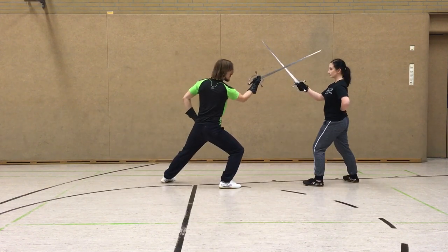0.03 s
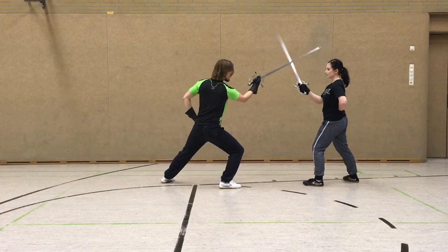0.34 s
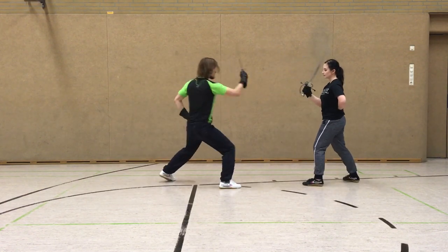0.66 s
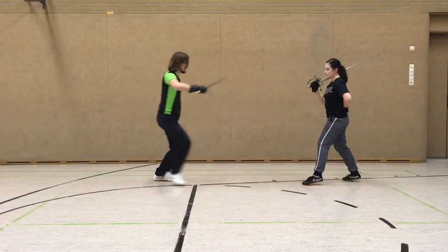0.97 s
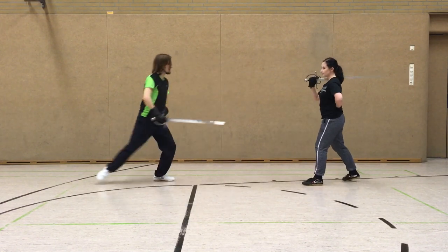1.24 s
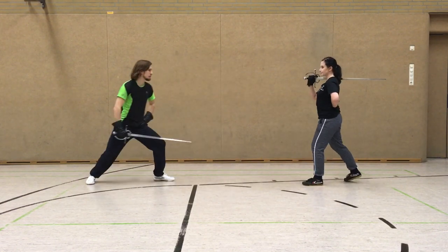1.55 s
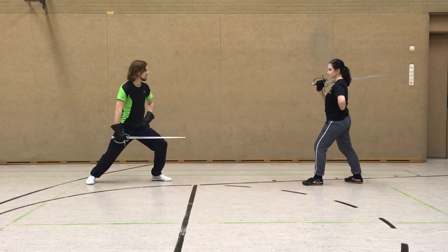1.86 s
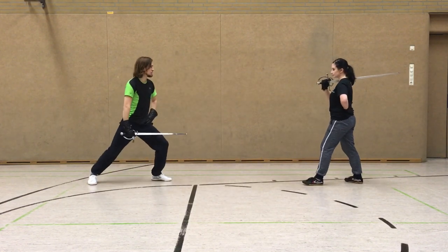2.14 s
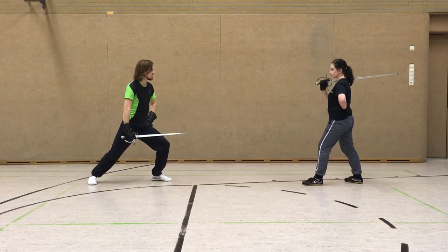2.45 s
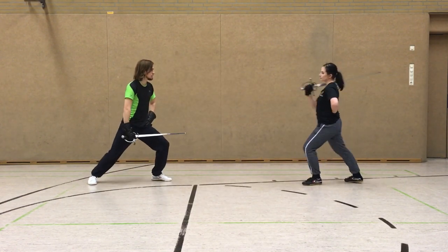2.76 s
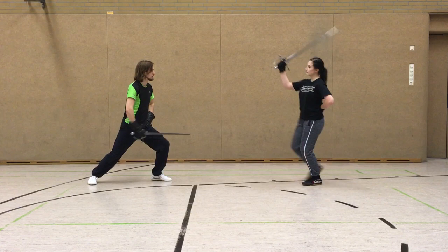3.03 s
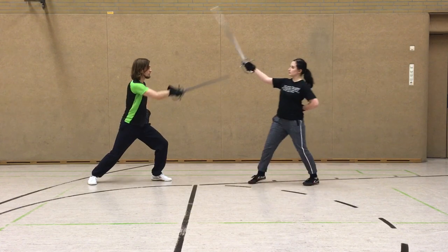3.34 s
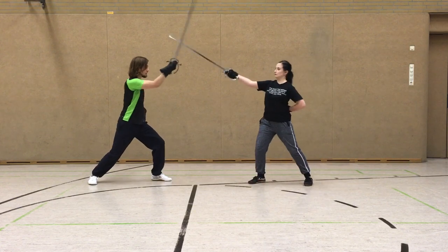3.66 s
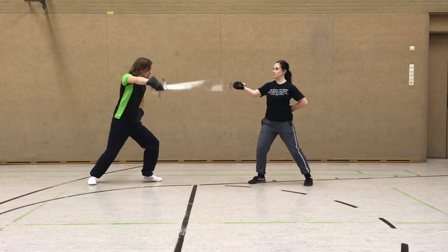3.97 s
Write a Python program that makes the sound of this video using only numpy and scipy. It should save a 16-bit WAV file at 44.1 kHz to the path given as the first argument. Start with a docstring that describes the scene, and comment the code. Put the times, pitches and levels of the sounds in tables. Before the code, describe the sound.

Rapier blades clash and ring after a run of footsteps in an echoing sports hall.

```python
"""Two fencers drill with rapiers in a sports hall. A hollow resonance fades over a quiet room tone.
A sleeve or sole swishes faintly; from 0.8 s shoes slap and thud on the sprung floor and a loose
hilt clicks. Two more swishes pass among the steps. After 3.5 s the blades clash, chatter and
scrape along each other, each contact waking the modes of the steel, and the hall rings on."""
import sys
import numpy as np
from scipy import signal
from scipy.fft import rfft, irfft, next_fast_len
from scipy.io import wavfile
from scipy.ndimage import map_coordinates

SR = 44100
rng = np.random.default_rng(int(sys.argv[2]) if len(sys.argv) > 2 else 0)


def file_out(sig):
    """Save sig as 16-bit WAV at sys.argv[1]."""
    # one column per channel
    cols = np.atleast_2d(sig).T
    # limit, then scale
    lim = np.clip(cols, -1, 1)
    pcm = np.round(lim * 32767).astype(np.int16)
    wavfile.write(sys.argv[1], SR, pcm)


N = 176400


def amp(db):
    """dB to gain."""
    return 10 ** (np.asarray(db) / 20)


def unit(x):
    """Scale to energy 1."""
    return x / np.sqrt(np.sum(x ** 2) + 1e-20)


def along(points, hz):
    """Interpolate (f/Hz, value) points on a log axis."""
    f, values = np.transpose(points)
    return np.interp(np.log(hz + 1), np.log(f + 1), values)


def fade(t, t60):
    """Gain falling 60 dB in t60."""
    return np.exp(-np.log(1000) * t / np.maximum(t60, 1e-4))


def mode(t, hz, db, t60):
    """Damped sine, random phase."""
    return amp(db) * fade(t, t60) * np.sin(2 * np.pi * (hz * t + rng.random()))


def noise(spectrum, size):
    """Coloured noise, rms 1."""
    gain = amp(along(spectrum, np.fft.rfftfreq(size, 1 / SR)))
    return unit(irfft(rfft(rng.standard_normal(size)) * gain, size)) * np.sqrt(size)


def add(track, start_s, sound):
    """Mix sound into track at start_s."""
    i = round(start_s * SR)
    track[i:i + len(sound)] += sound[:N - i]


# Hall reverberation: f/Hz, t60/s
HALL_DECAY = [(100, 1.34), (500, 4.6), (1300, 1.13), (3500, 2.7), (6000, 1.15), (9000, 0.97), (15000, 0.37)]


def hall(x, wet_db, delay_s=0.0048, build_s=0.005, echo_span_s=0.035, echo_db=-12.5):
    """Direct sound, ten floor and wall echoes, and a long tail that dulls as it dies."""
    hz, t, white = signal.stft(rng.standard_normal(3 * SR // 2), SR, nperseg=256)
    tail = signal.istft(white * fade(t, along(HALL_DECAY, hz)[:, None]), SR, nperseg=256)[1]
    late_s = np.maximum(np.arange(len(tail)) / SR - delay_s, 0)
    response = amp(wet_db) * unit(tail * (1 - np.exp(-late_s / build_s)))
    echo_at = (SR * echo_span_s * (.1 + rng.random(size=10))).astype(int)
    response[echo_at] += amp(wet_db + echo_db) * unit(rng.standard_normal(size=10))
    response[0] += 1
    return signal.fftconvolve(x, response)[:N]


# Room tone spectrum: f/Hz, level/dB
ROOM_TONE = [(20, -13), (40, -8.5), (85, -2.5), (175, -4.5), (300, -4), (470, -16), (800, -22), (1400, -24),
             (2400, -28), (4800, -30.5), (7400, -37), (9000, -33), (13500, -38), (15000, -43), (15800, -49)]
# Hollow resonance spectrum: f/Hz, level/dB
HOLLOW = [(200, -13.5), (450, -9.5), (550, -2.5), (690, -2.5), (820, -19.5), (1250, -19), (2000, -32),
          (5000, -62)]


def room(tone_db=-65.5, waver_db=0.16, waver_per_s=6, hollow_db=-63, hollow_t60_s=2.04):
    """Near-steady rumble and hiss; a hollow resonance dies away in the hall."""
    t = np.arange(N) / SR
    waver = map_coordinates(rng.standard_normal(size=200), [t * waver_per_s])
    tone = amp(tone_db - waver_db * waver) * noise(ROOM_TONE, N)
    return tone + amp(hollow_db) * fade(t, hollow_t60_s) * noise(HOLLOW, N)


# Swishes: peak t/s, rise sigma/s, fall sigma/s, level/dB
SWISHES = [(.85, 0.15, 0.052, -76.5), (1.705, 0.036, 0.037, -67.5), (2.17, 0.031, 0.024, -70)]
# Rubbing spectrum: f/Hz, level/dB
RUBBING = [(200, -4), (900, 2.5), (2200, 5), (4500, 3), (7500, -3.5), (11500, -1.5), (16000, -9)]


def swishes():
    """Sleeves and sliding soles rub; the noise swells and falls with each quick move."""
    t = np.arange(N) / SR
    envelope = sum(amp(db) * np.exp(-.5 * ((t - peak_s) / np.where(t < peak_s, rise_s, fall_s)) ** 2)
                   for peak_s, rise_s, fall_s, db in SWISHES)
    return hall(envelope * noise(RUBBING, N), wet_db=-2)


# Footfalls: t/s, thud level/dB, slap level/dB
STEPS = [(0.796, -21.5, -36.5), (1.007, -14.5, -25.5), (1.18, -20.5, -34.5), (1.342, -8, -27.5),
         (1.555, -19, -38), (1.603, -18, -38), (1.736, -17.5, -29), (1.85, -23.5, -44), (2.2, -34.5, -39),
         (2.364, -33, -39), (2.712, -32, -32), (2.959, -29, -52), (3.32, -8.5, -22), (3.429, -15, -26.5)]
# Sprung floor modes: f/Hz, level/dB, t60/s
FLOOR_MODES = [(67, -17.5, 0.053), (84.4, -0.5, 0.25), (111.4, 1.5, 0.11), (154.5, 7.5, 0.12),
               (212.5, -7.5, 0.088), (252.6, -5.5, 0.064)]
# Board rattle spectrum: f/Hz, level/dB
BOARDS = [(30, -34), (70, 14.5), (150, 0.5), (280, 2), (420, -12.5), (600, -21.5), (1200, -43.5),
          (4000, -76)]
# Sole slap spectrum: f/Hz, level/dB
SOLE = [(100, 22.5), (400, -6), (700, 2), (1400, 4), (2500, -5.5), (4000, -34), (12000, -32)]


def footsteps(detune=0.13, boards_db=-9, thud_rise_s=0.031, slap_rise_s=0.0025):
    """A rubber sole lands softly; the weight rattles boards and booms the floor, each spot its own way."""
    thuds, slaps, t = np.zeros(N), np.zeros(N), np.arange(SR // 2) / SR
    for start_s, thud_db, slap_db in STEPS:
        boom = sum(mode(t, hz * (1 + detune * rng.normal()), db, t60) for hz, db, t60 in FLOOR_MODES)
        rattle = unit(noise(BOARDS, len(t)) * fade(t, t60=0.23))
        thud = (unit(boom) + amp(boards_db) * rattle) * (1 - np.exp(-t / thud_rise_s))
        slap = noise(SOLE, len(t)) * fade(t, t60=0.054) * (1 - np.exp(-t / slap_rise_s))
        add(thuds, start_s, amp(thud_db) * unit(thud))
        add(slaps, start_s, amp(slap_db) * unit(slap))
    return hall(thuds, wet_db=-6.5) + hall(slaps, wet_db=-0.5)


# Hilt clicks: t/s, level/dB
CLICKS = [(0.866, -41), (1.191, -44), (3.1968, -27), (3.209, -31.5), (3.336, -37)]
# Guard tick spectrum: f/Hz, level/dB
GUARD = [(300, -1.5), (1200, 6.5), (2500, 6.5), (5000, -1.5), (7500, -6.5), (10000, -4), (11000, 8.5),
         (12500, -6), (16000, -4)]


def hilt(ring_hz=10900, ring_db=-25):
    """A loose guard ticks and rings thinly as the sword turns."""
    clicks, t = np.zeros(N), np.arange(SR // 2) / SR
    for start_s, db in CLICKS:
        tick = unit(noise(GUARD, len(t)) * fade(t, t60=0.02))
        ring = unit(np.sin(2 * np.pi * ring_hz * t) * fade(t, t60=0.13))
        add(clicks, start_s, amp(db) * (tick + amp(ring_db) * ring))
    return hall(clicks, wet_db=0.5)


# Blade contacts: t/s, relative level/dB, chatter t60/s, treble tilt/(dB/octave)
CONTACTS = [(3.5468, -17, 0.012, 1.5), (3.5625, -22.5, 0.025, 0), (3.572, -20.5, 0.03, 0),
            (3.678, -24, 0.16, 0), (3.6935, -28, 0.027, 1.5), (3.7578, -23, 0.069, 3),
            (3.783, -29.5, 0.083, -2), (3.797, -24, 0.033, 1.5)]
# Strong blade modes: f/Hz, level/dB, t60/s
BLADE_MODES = [(737, -9, .9), (1104, -3, .8), (1348, 1.5, .7), (1763, -5, .8), (2331, -5, .7),
               (2530, -3, .7), (2912, -4, .7), (3222, -4, .7), (3924, -4, .7), (4274, -3, .7),
               (4678, -4, .6), (5406, -3, .6), (5872, 4.5, .35), (6385, -2, .5), (8986, -1.5, .5),
               (9048, 0, .55), (10642, 0, .4), (11186, -1, .4), (11807, -2, .4), (15381, -4, .3),
               (15532, -4, .3)]
# Crowd of weak blade and guard modes: f/Hz, spectral density/dB
STEEL = [(120, -40), (170, -21), (300, -7), (540, -11), (700, -1), (960, -9.5), (1200, 2), (1800, -5),
         (2600, -1), (3700, -4.5), (6000, 2), (7300, -1), (9000, 2.5), (11500, 5), (13500, -1.5),
         (15700, -1.5)]
TOP_HZ = 15800


def blades(gain_db=26.5, blow=0.43, crack_db=-3, ring_db=-10, flex_hz=8.07,
           weak_modes=480, cluster_db=2, cluster_hz=27, radiate_hz=156):
    """Each contact, a blow and a dying chatter of tiny impacts, wakes its own mix of steel modes."""
    clatters, rings, t = np.zeros(N), np.zeros(N), np.arange(SR // 2) / SR
    spread = (np.arange(weak_modes) + rng.random(size=weak_modes)) / weak_modes
    crowd_hz = 150 + (TOP_HZ - 150) * spread ** 1.35
    crowd_gain = amp(along(STEEL, crowd_hz)) * np.sqrt(np.gradient(crowd_hz))
    f = np.fft.rfftfreq(SR, 1 / SR)  # 1 Hz bins
    octaves = np.log2(np.maximum(f, 1000) / 6000)
    # Weak modes bunch around the strong ones.
    clusters = 1 + sum(amp(cluster_db + mode_db / 2) * np.exp(-.5 * ((f - hz) / cluster_hz) ** 2)
                       for hz, mode_db, _ in BLADE_MODES)
    for start_s, db, chatter_s, tilt_db in CONTACTS:
        lines = np.zeros(len(f), complex)
        lines[crowd_hz.astype(int)] = crowd_gain * np.exp(2j * np.pi * rng.random(weak_modes))
        crowd = unit(irfft(lines)[:len(t)] * fade(t, t60=0.14))
        crack = unit(noise(STEEL, len(t)) * fade(t, t60=0.011))
        response = rfft(crowd + amp(crack_db) * crack, SR) * clusters * amp(tilt_db * octaves)
        force = unit(rng.laplace(size=len(t)) * fade(t, chatter_s))
        force[0] += blow
        clatter = unit(irfft(rfft(force, SR) * response)[:len(t)])
        # A flexed blade rings slightly off pitch.
        ring = sum(mode(t, hz + flex_hz * rng.normal(), mode_db, t60)
                   for hz, mode_db, t60 in BLADE_MODES)
        add(clatters, start_s, amp(db) * hall(clatter, wet_db=-0.5))
        add(rings, start_s, amp(db + ring_db) * unit(ring * (1 - fade(t, chatter_s))))
    # A thin blade radiates little bass.
    radiation = signal.butter(2, radiate_hz, "highpass", fs=SR, output="sos")
    return amp(gain_db) * signal.sosfilt(radiation, clatters + hall(rings, wet_db=-9.5))


def scene():
    """Mono sum of all sources."""
    return (room() + swishes() + footsteps() + hilt() + blades())[None]


def record(dry, low_cut_hz=41, edge_hz=70):
    """Cut the deepest rumble; band-limit at TOP_HZ."""
    size = next_fast_len(N + SR // 2)
    thinned = signal.sosfilt(signal.butter(2, low_cut_hz, "highpass", fs=SR, output="sos"), dry)
    passband = .5 - .5 * np.tanh((np.fft.rfftfreq(size, 1 / SR) - TOP_HZ) / (2 * edge_hz))
    return irfft(rfft(thinned, size) * passband, size)[:, :N]


dry = scene()
out = record(dry)
file_out(out)
```